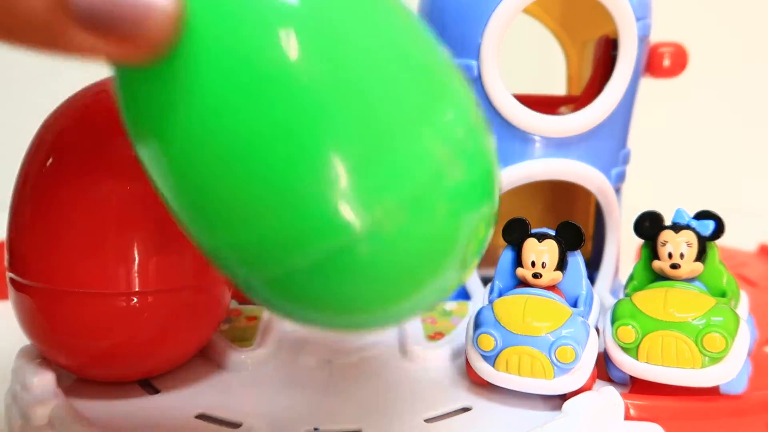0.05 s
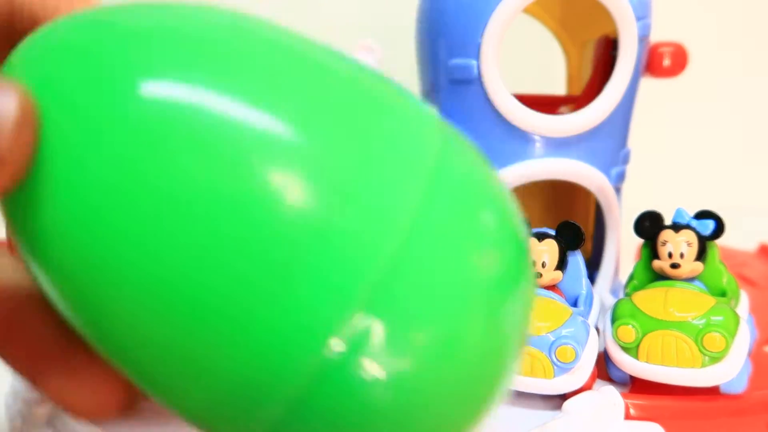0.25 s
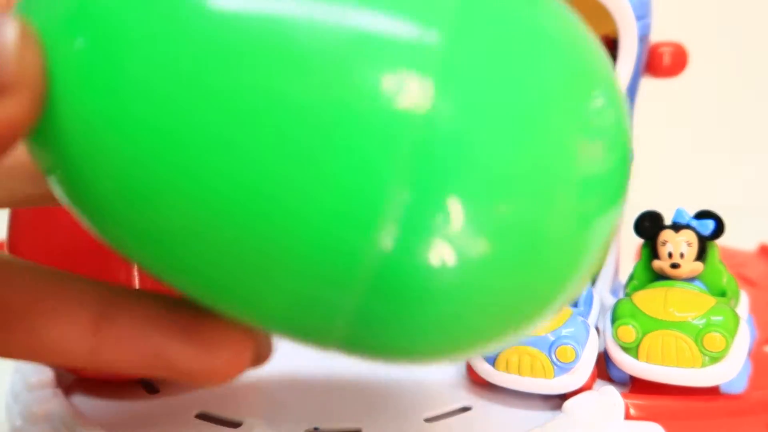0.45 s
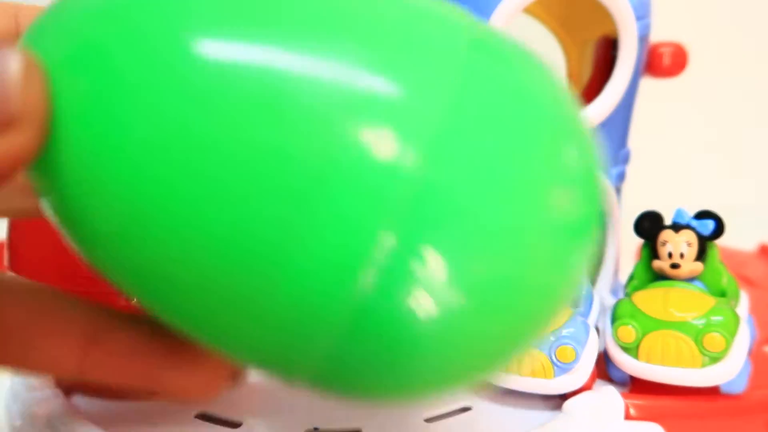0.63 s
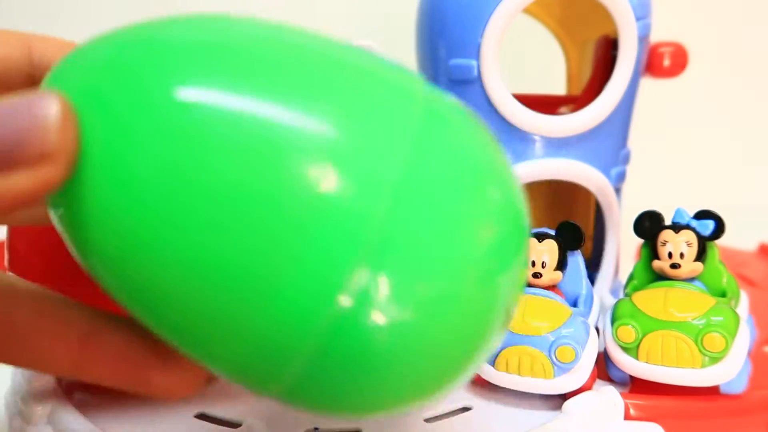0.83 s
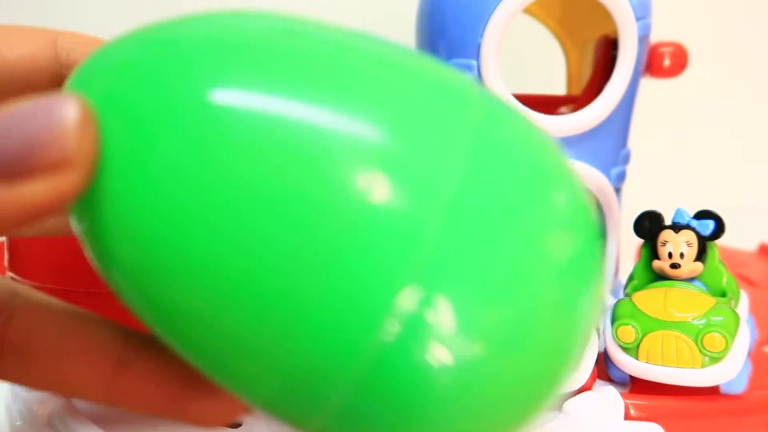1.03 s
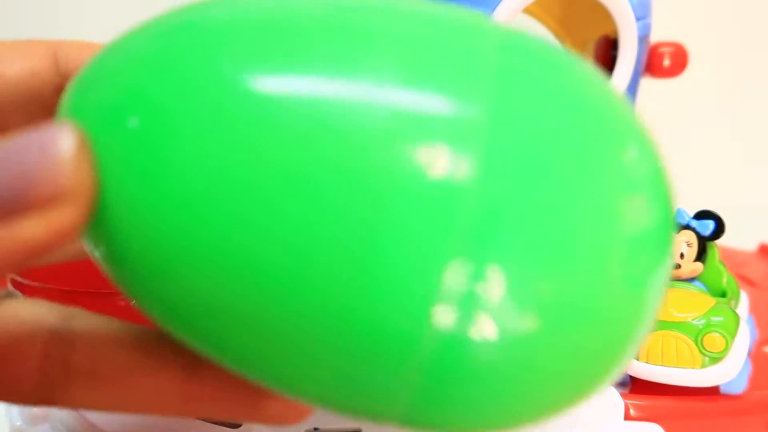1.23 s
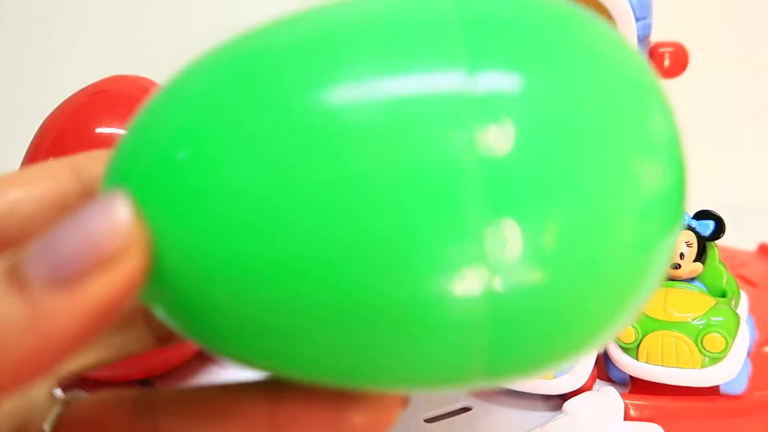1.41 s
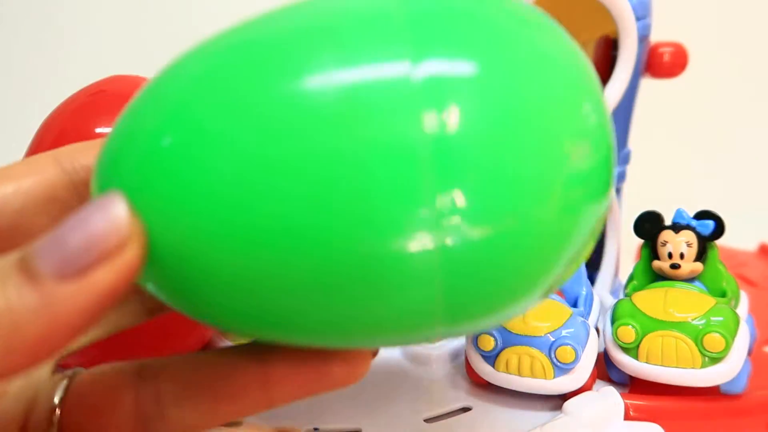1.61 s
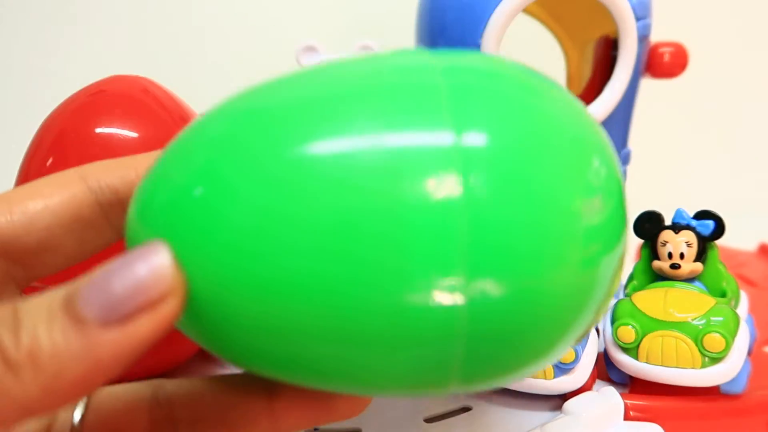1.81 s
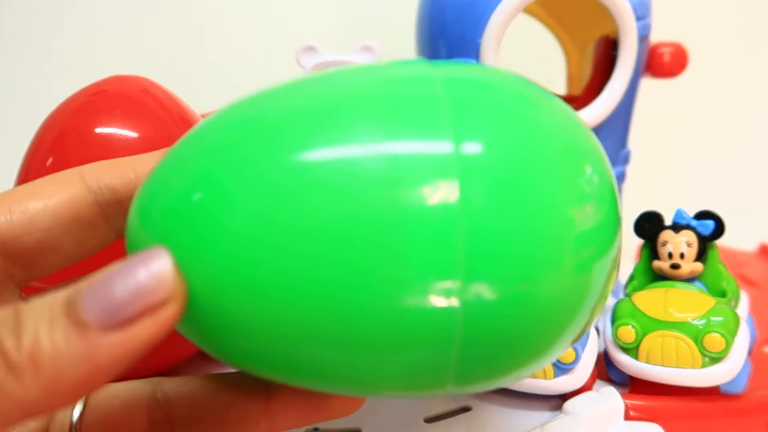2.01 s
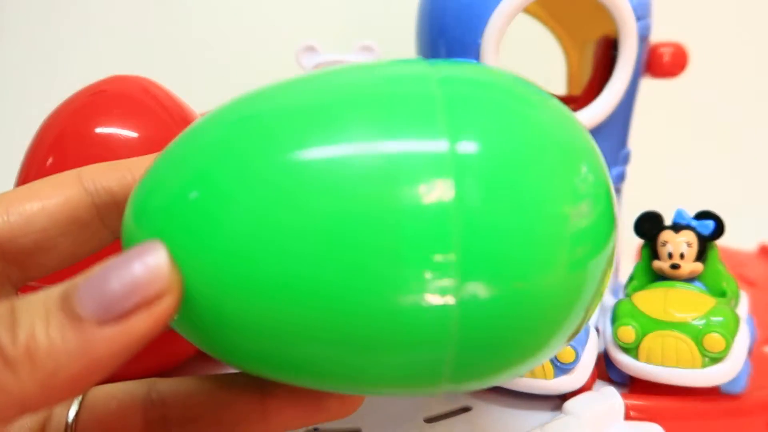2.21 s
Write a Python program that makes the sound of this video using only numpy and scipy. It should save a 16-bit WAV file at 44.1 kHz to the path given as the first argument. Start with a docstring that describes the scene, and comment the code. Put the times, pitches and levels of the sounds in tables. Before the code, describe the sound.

Hollow, irregular knocks come from a toy shaken inside a plastic egg, close to the microphone. A short cluster leads to a longer rattle with light scraping, which weakens and stops, leaving a small room's faint hum.

```python
"""Hollow knocks and rattles: a hand shakes a plastic egg close to two microphones in a small room.
A loose toy knocks about inside, slides along the wall and settles. Each blow gives a dead knock of the
wall, a low thud of the held egg, a short ring of the shell and a crack of the contact.
The recorder's gain control ducks on the loud blows, so the room's hum sinks and slowly comes back."""
import sys
import numpy as np
from scipy import signal
from scipy.fft import rfft, irfft
from scipy.io import wavfile
from scipy.ndimage import uniform_filter1d

SR = 44100
rng = np.random.default_rng(int(sys.argv[2]) if len(sys.argv) > 2 else 0)


def digitize_waveform(pressure):
    """Quantize a signal to 16-bit integers and store it at the path in sys.argv[1].

    Rows of a 2-D input are taken as channels; values are limited to [-1, 1].
    """
    field = np.atleast_2d(pressure).T
    bounded = np.clip(field, -1, 1)
    quanta = np.round(bounded * 32767).astype(np.int16)
    wavfile.write(sys.argv[1], SR, quanta)


N = 103635
BLOW_S, LOUD_S = .2, .005  # a whole blow, and its loud part


def amp(db):
    """Decibels to gain."""
    return 10 ** (np.asarray(db) / 20)


def curve(points, hz):
    """Read a table on a log-frequency axis."""
    f, v = np.array(points).T
    return np.interp(np.log(hz + 1), np.log(f), v)


def fade(t, t60):
    """Exponential decay by 60 dB in t60 seconds."""
    return np.exp(-np.log(1000) * t / t60)


def unit(x):
    """Give a short sound the energy of LOUD_S seconds at rms 1."""
    return x / np.sqrt(np.mean(np.sum(x ** 2, axis=-1)) / (LOUD_S * SR))


def add(out, start_s, sound):
    """Mix a short sound in at start_s."""
    i = int(start_s * SR)
    out[:, i:i + sound.shape[-1]] += sound


def noise(size, points, apart_hz=6000):
    """Coloured noise at two close microphones: alike in the bass, unrelated above apart_hz."""
    hz = np.fft.rfftfreq(size, 1 / SR)
    mid, side = rfft(rng.standard_normal((2, size)))
    share = np.clip(np.hypot(0.066, hz / apart_hz), 0, 1)
    both = (mid + np.array([[1], [-1]]) * share * side) / np.sqrt(1 + share ** 2)
    return irfft(both * amp(curve(points, hz)), size)


def ping(hz, t60):
    """One damped resonance that swells over its first half cycle."""
    t = np.arange(int(BLOW_S * SR)) / SR
    return unit(np.sin(2 * np.pi * hz * t) * (1 - np.exp(-2 * hz * t)) * fade(t, t60))


# mains hum in the room: pitch_hz, level_db
MAINS_HUM = [(50, -66), (99, -56), (203, -50.5), (300, -59.5)]
# drone and hiss of the room's air: frequency_hz, relative_density_db
AIR_SPECTRUM = [(25, -21), (70, -21.5), (120, -11.5), (175, -2), (250, -16.5), (420, -20), (700, -27),
                (2000, -31), (6000, -39.5), (14000, -51.5)]
AIR_DB, HUM_WAVER = -47.5, .25


def room_tone():
    """Wavering mains hum over the low drone and hiss of the room, far below the egg in level."""
    t = np.arange(N) / SR
    air, hum = noise(N, AIR_SPECTRUM), 0
    for hz, db in MAINS_HUM:
        waver = np.interp(t, np.linspace(0, t[-1], 16), rng.standard_normal(16))
        tone = np.sqrt(2) * np.sin(2 * np.pi * (hz * t + rng.random()))
        hum = hum + amp(db) * (1 + HUM_WAVER * waver) * tone
    return hum + amp(AIR_DB) * air / air.std()


# colour of the room's reverberation at the microphones: frequency_hz, gain_db
REVERB_SPECTRUM = [(80, -11), (200, -18), (450, -11.5), (900, -14), (1800, -11.5), (3500, -8.5),
                   (7000, -4.5), (14000, -9)]
# its decay, band by band: frequency_hz, t60_s
REVERB_DECAY = [(150, 0.51), (500, 0.33), (1200, 0.43), (3000, .38), (7000, 0.36), (14000, 0.17)]
ROOM_DELAY_S, ROOM_CHANGE_S = 0.0047, .08


def reverberation(x):
    """The tail of a small room, each band with its own decay; the echoes change as the egg moves."""
    t = np.arange(SR // 2) / SR
    hz = np.fft.rfftfreq(len(t), 1 / SR)
    centres = [f for f, _ in REVERB_DECAY]
    bands = np.array([curve([(f, f == centre) for f in centres], hz) for centre in centres])
    decays = np.array([fade(t, t60) * (t > ROOM_DELAY_S) for _, t60 in REVERB_DECAY])
    decays /= np.linalg.norm(decays, axis=1, keepdims=True)
    hop = int(ROOM_CHANGE_S * SR)
    source = np.pad(x.mean(axis=0), (0, 2 * hop))
    out = np.zeros((2, N + SR))
    for i in range(0, N, hop):
        wash = rfft(noise(len(t), REVERB_SPECTRUM))
        tail = np.sum(irfft(wash[:, None] * bands, len(t)) * decays, axis=1)
        piece = source[i:i + 2 * hop] * signal.windows.cosine(2 * hop)
        add(out, i / SR, signal.fftconvolve(piece[None], tail, axes=1))
    return out[:, :N]


def near_reflections(hit, gain_db=-9.5, t60_s=0.11, delay_s=0.0033):
    """A hit plus its quick scatter off the table top and nearby toys, new with every move of the egg."""
    t = np.arange(hit.shape[1]) / SR
    decay = fade(t, t60_s) * (t > delay_s)
    echoes = noise(len(t), [(150, -1), (600, 1.5), (8000, 3.5)]) * decay / np.linalg.norm(decay)
    scatter = signal.fftconvolve(hit.mean(axis=0)[None], echoes, axes=1)[:, :len(t)]
    return hit + amp(gain_db) * scatter


# fingers on the smooth shell, close to the microphones: peak_s, level_db, centre_hz, half_width_s
FINGER_RUBS = [(0.572, -60, 6000, .045), (1.576, -49.5, 9230, .015)]


def fingers():
    """Faint swells of high hiss as the grip shifts and the fingers rub the shell."""
    t, out = np.arange(N) / SR, 0
    edge = 2 ** .8  # 0.8 octave
    for peak_s, db, hz, half_width_s in FINGER_RUBS:
        hiss = noise(N, [(hz / edge ** 2, -40), (hz, 0), (hz * edge, -20)])
        swell = np.exp(-((t - peak_s) / half_width_s) ** 2)
        out = out + amp(db) * hiss / hiss.std() * swell
    return out


# the toy sliding on the inside wall between blows: time_s, level_db
SLIDE_LEVEL = [(.58, -90), (.617, -24.5), (.68, -28), (.85, -32.5), (.935, -24), (1.05, -27), (1.26, -32),
               (1.38, -30), (1.52, -30.5), (1.66, -49), (1.74, -78.5)]
# colour of its scuffing: frequency_hz, relative_density_db
SLIDE_SPECTRUM = [(100, -10.5), (350, -3), (800, -7), (1500, -12.5), (3000, -15.5), (6000, -26),
                  (10000, -35.5), (15000, -42)]


def slide(grains_per_s=410, rough_db=7.5):
    """Grainy scuffing of the toy as it slides along the wall."""
    t = np.arange(N) / SR
    grain = np.interp(t * grains_per_s, np.arange(N), rng.standard_normal(N))
    scuff = noise(N, SLIDE_SPECTRUM) * amp(rough_db * grain)
    level_db = np.interp(t, *np.array(SLIDE_LEVEL).T)
    return scuff / scuff.std() * amp(level_db)


def tumble(bumps_per_s=85, above_slide_db=2.5, centre_hz=520, spread_oct=.7):
    """Soft low bumps of the tumbling toy at random moments; their level follows the sliding."""
    out = np.zeros((2, N + SR))
    for when, pitch in rng.random((int(bumps_per_s * N / SR), 2)):
        start_s = when * N / SR
        db = above_slide_db + np.interp(start_s, *np.array(SLIDE_LEVEL).T)
        hz = centre_hz * 2 ** (spread_oct * (2 * pitch - 1))
        add(out, start_s, amp(db) * ping(hz, t60=0.019))
    return out[:, :N]


# ring of the shell and the air in it: pitch_hz, relative_level_db, t60_s
SHELL_MODES = [(544, -31, .09), (745, -24, 0.033), (950, -22.5, 0.21), (1170, -29.5, 0.016),
               (1150, 12.5, 0.0018), (1687, 9.5, 0.0048), (1895, -2.5, 0.013), (2260, 3, 0.0059),
               (2725, -5, 0.014), (2956, -6, 0.018), (3467, -8, 0.011), (3950, -9.5, 0.012),
               (4670, -10.5, 0.0091), (5330, -11, 0.01)]
# crack of the toy meeting the wall: frequency_hz, relative_density_db
CRACK_SPECTRUM = [(500, -27.5), (1500, 4.5), (3500, -6), (5500, -8), (7500, -9), (10000, -14), (13500, -16),
                  (16000, -34)]
THUD_HZ, THUD_DB, THUD_DB_PER_OCT, CONTACT_S = 245.5, 17, -16.5, 0.00013
PLACE_DB, PLACE_DETUNE = 1.5, .04  # random spread of each mode with the place struck
SOFT_HZ, SOFT_TILT = 1150, 0.81  # a weaker ring loses its upper modes: dB per octave for each dB
LIGHT_DB, DULL_HZ, DULL_TILT = -4.5, 4000, .2  # lighter blows crack duller: dB per octave for each dB


def blow(db, knock_hz, ring_db, crack_db):
    """The toy hits the wall once: knock, thud, shell ring and crack. Here db only dulls the crack."""
    t = np.arange(int(BLOW_S * SR)) / SR
    mode = lambda hz, t60: np.sin(2 * np.pi * hz * t) * fade(t, t60)
    knock = t * mode(knock_hz, t60=0.0035)  # swells and dies in about two cycles
    thud = (1 - np.exp(-t / CONTACT_S)) * mode(THUD_HZ, t60=0.0099)
    thud_db = THUD_DB + THUD_DB_PER_OCT * np.log2(knock_hz / THUD_HZ)  # high knocks shake the egg less
    ring = 0
    for k, (hz, mode_db, t60) in enumerate(SHELL_MODES):
        louder, sharper = rng.standard_normal(2)
        tilt_db = SOFT_TILT * (ring_db + 6) * np.log2(max(hz / SOFT_HZ, 1))
        gain = (-1) ** k * amp(mode_db + PLACE_DB * louder + tilt_db)
        ring = ring + gain * mode(hz * (1 + PLACE_DETUNE * sharper), t60)
    dull_db_per_oct = DULL_TILT * min(db - LIGHT_DB, 0)
    colour = [(f, level + dull_db_per_oct * np.log2(max(f / DULL_HZ, 1))) for f, level in CRACK_SPECTRUM]
    crack = noise(len(t), colour, apart_hz=10500) * fade(t, t60=.0095)
    body = unit(knock) - amp(thud_db) * unit(thud)
    return body + amp(ring_db) * unit(ring) + amp(crack_db) * unit(crack)


# blows of the toy on the shell, heard close up: start_s, knock_db, knock_hz, ring_db, crack_db
# (ring and crack are relative to the knock)
TOY_BLOWS = [ (0.2427, -1, 562, -8, -15.5), (0.2492, -5.5, 600, -22, -37), (0.2598, 1.5, 816, -8.5, -6),
             (0.2662, -10.5, 495, -6, -32), (.324, -4.5, 746, 1, -3), (.3272, 1, 488, -6, -12.5),
             (0.3349, -1.5, 755, -37, -25), (0.3656, -5.5, 676, -36, -32), (0.441, -20.5, 513, -8.5, -32),
             (0.6217, -10.5, 550, -13, -8.5), (0.6403, -2, 746, -5.5, -16.5),
             (0.6568, -19, 694, -27, -19.5), (0.7032, -24, 790, 1, 2), (.708, -13.5, 770, 5, -7.5),
             (0.7101, -3.5, 724, -28, -7.5), (.719, -3.5, 780, -5.5, -22.5), (0.7798, -6, 770, -7, -15.5),
             (.823, -21.5, 650, -9, -16), (.8623, -20.5, 664, -12.5, -21), (.898, -6, 786, -4, -3),
             (.9289, -14, 611, 4, 0.5), (0.9427, 5.5, 712, -3, -3), (1.0151, -8.5, 680, -4.5, -17.5),
             (1.102, -1, 767, -5, -13.5), (1.1109, -2, 546, -4, -10.5), (1.1218, -14.5, 880, 4, 3.5),
             (1.1669, -10, 864, -10.5, -31), (1.2011, -15.5, 485, -9.5, -17),
             (1.214, -22.5, 577.6, -17.5, -23.5), (1.293, -3, 635, -7, -3.5), (1.3588, -9, 660, -3.5, -14),
             (1.3819, -13, 770, -10.5, -16), (1.4176, -11.5, 650, -9.5, -7.5),
             (1.442, -14, 835, -19.5, -25), (1.466, -13.5, 730, -9, -13.5), (1.4872, -15.5, 520, -16, -19),
             (1.5137, -16.5, 735, -12.5, -24), (1.5233, -16, 500, -27.5, -28),
             (1.603, -26.5, 620, -20, -23), (1.6439, -26, 698, -12.5, -12.5),
             (1.6635, -29.5, 660, -11.5, -10.5), (2.0497, -48, 650, -11.5, -4.5)]
# hollow resonances of the spot struck, shifting as toy and grip move: start_s, level_db, pitch_hz
HOLLOW_SPOTS = [(.2426, -1.5, 255), (.2426, -9, 740), (.2603, 0, 510), (.3268, -3, 418.7),
                (.3265, -16.5, 1650), (.7098, -10.5, 700), (.7796, -23.5, 1450), (.794, -16.5, 400),
                (.8985, -12, 1030), (.9428, -10.5, 660), (1.2932, -5.5, 760), (1.2932, -2.5, 1380),
                (1.2936, -15, 1680), (1.2932, -7.5, 3500)]
# light ticks of the toy's own hard parts: start_s, level_db, pitch_hz
TOY_TICKS = [(0.7204, -17.5, 5500), (0.9423, 1, 2950), (1.2940, -10, 4860), (1.4188, -28.5, 6000),
             (1.5024, -28, 4320)]
LOW_CUT_HZ = 85


def egg():
    """The shaken egg just in front of the microphones: the toy knocks, ticks, slides and tumbles."""
    hits = np.zeros((2, N + SR))
    for start_s, db, knock_hz, ring_db, crack_db in TOY_BLOWS:
        add(hits, start_s, amp(db) * near_reflections(blow(db, knock_hz, ring_db, crack_db)))
    for start_s, db, hz in HOLLOW_SPOTS:
        add(hits, start_s, amp(db) * ping(hz, t60=13 / hz))  # dies away in 13 cycles
    for start_s, db, hz in TOY_TICKS:
        add(hits, start_s, amp(db) * ping(hz, t60=.008))
    low_cut = signal.butter(2, LOW_CUT_HZ, "high", fs=SR, output="sos")
    return signal.sosfilt(low_cut, hits[:, :N] + slide() + tumble())


def scene():
    """The egg and the hand up close, with the small room's tail and hum behind them."""
    rattle = egg() + fingers()
    return rattle + reverberation(rattle) + room_tone()


CEILING_DB, RECOVER_DB_PER_S, TOP_HZ = -10, 10.5, 15200


def record(dry):
    """The recorder: its gain drops at once and recovers slowly; it clips and cuts the top treble."""
    power = uniform_filter1d(dry.mean(axis=0) ** 2, int(LOUD_S * SR))
    over_db = np.maximum(10 * np.log10(np.abs(power) + 1e-12) - CEILING_DB, 0)
    recovery_db = RECOVER_DB_PER_S * np.arange(N) / SR
    duck_db = np.maximum.accumulate(over_db + recovery_db) - recovery_db
    clipped = np.clip(dry * amp(-duck_db), -1, 1)
    top_cut = signal.ellip(8, .2, 80, TOP_HZ, fs=SR, output="sos")
    return signal.sosfilt(top_cut, clipped)


dry = scene()
out = record(dry)
digitize_waveform(out)
```